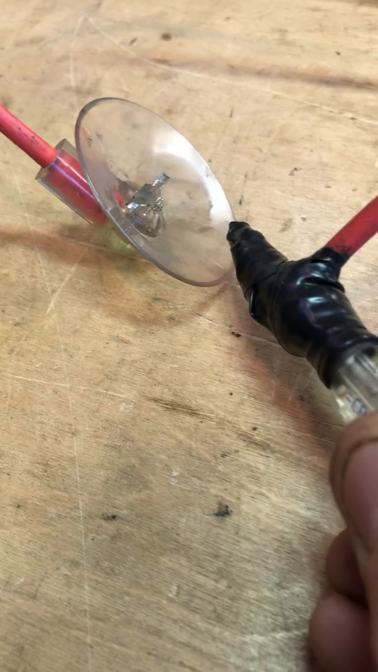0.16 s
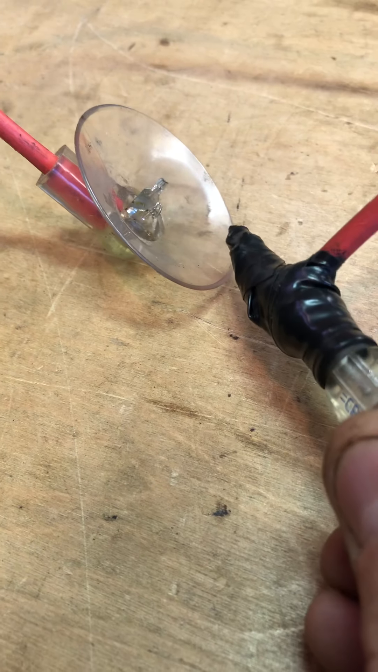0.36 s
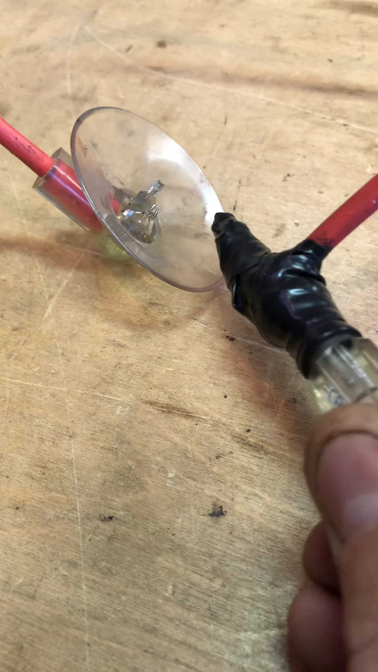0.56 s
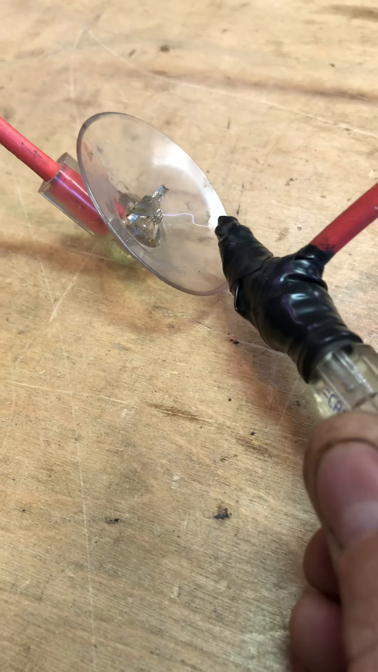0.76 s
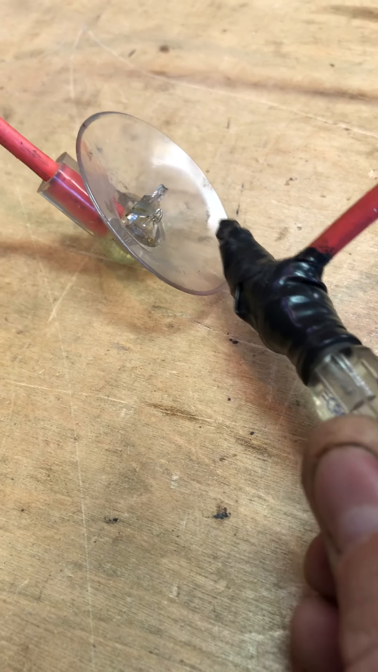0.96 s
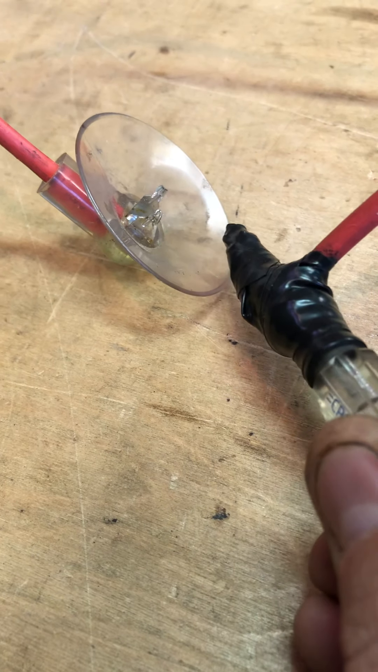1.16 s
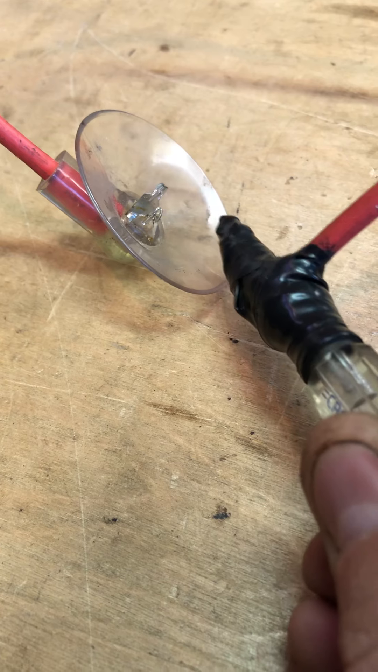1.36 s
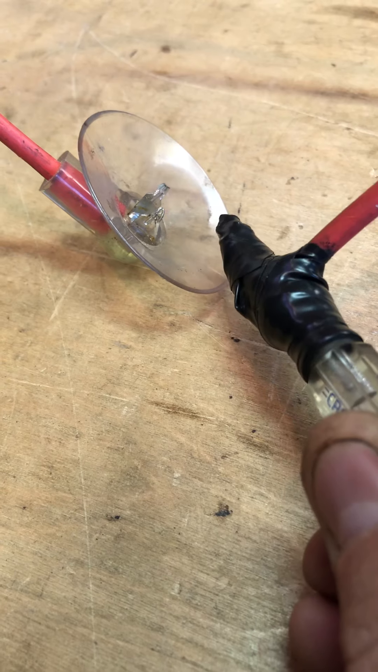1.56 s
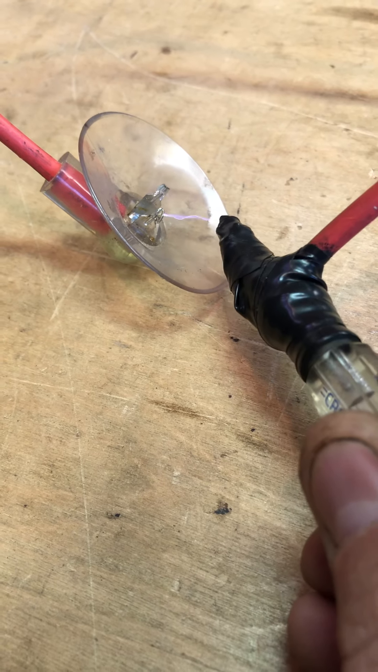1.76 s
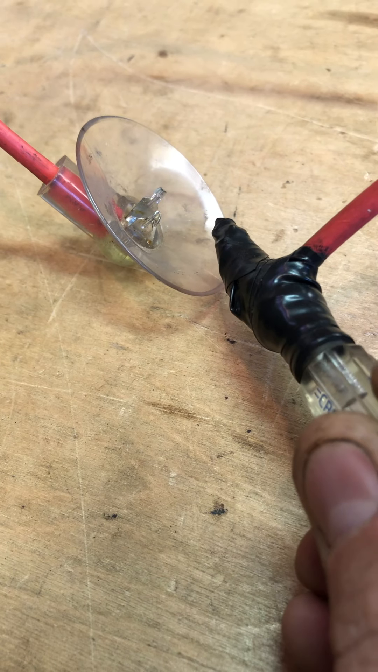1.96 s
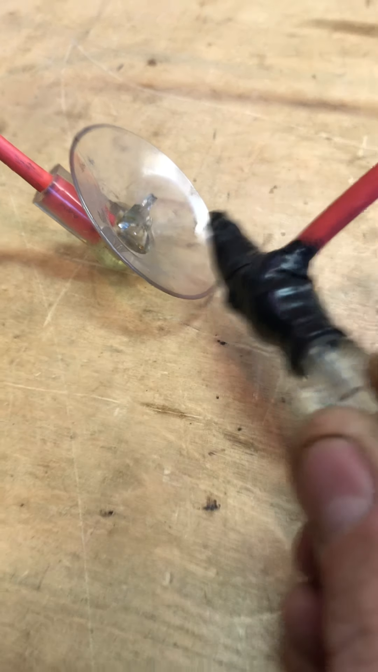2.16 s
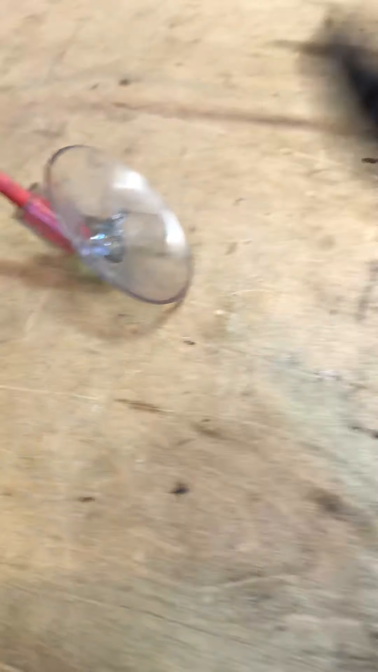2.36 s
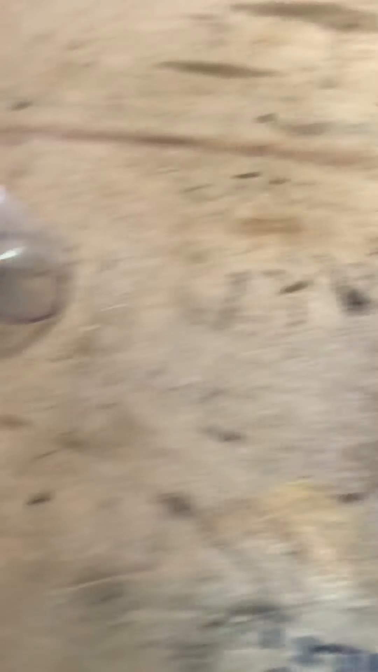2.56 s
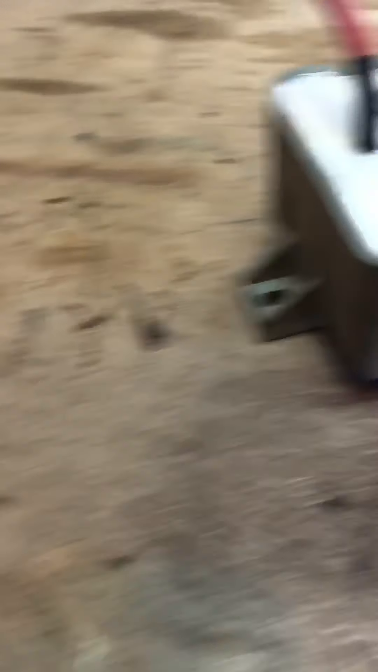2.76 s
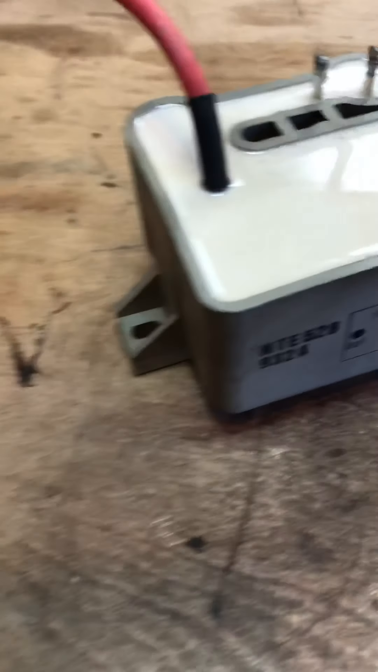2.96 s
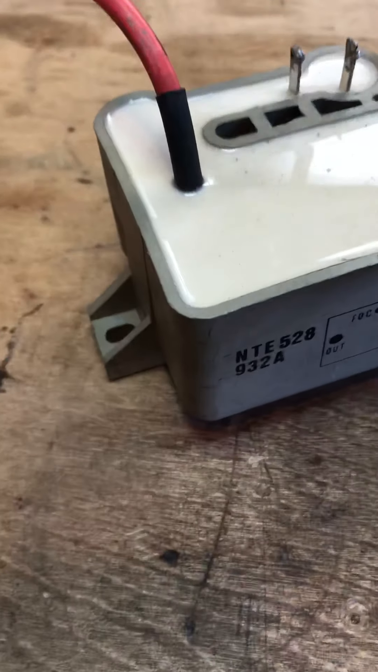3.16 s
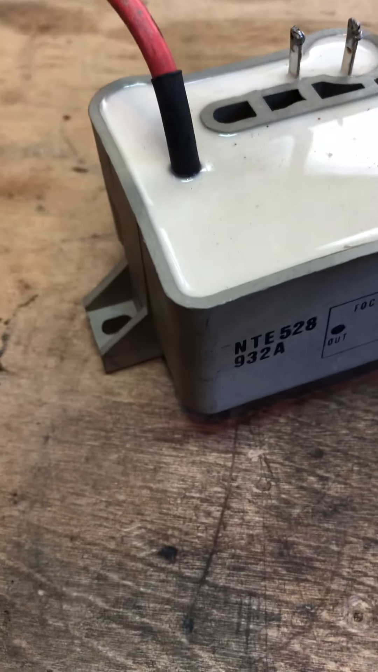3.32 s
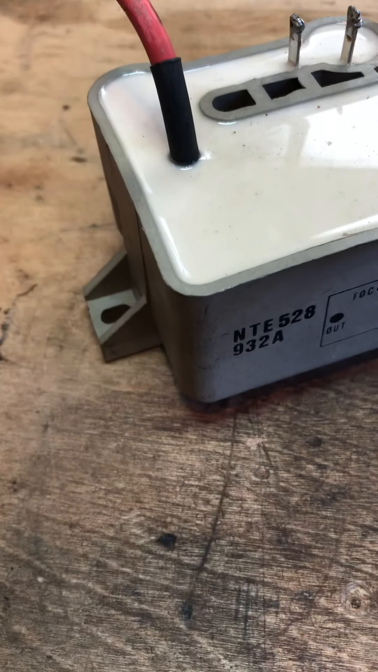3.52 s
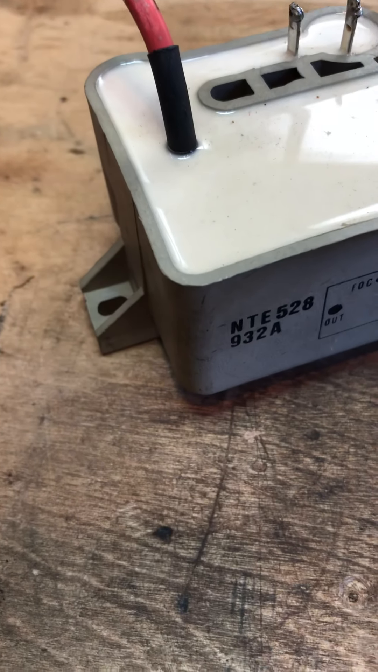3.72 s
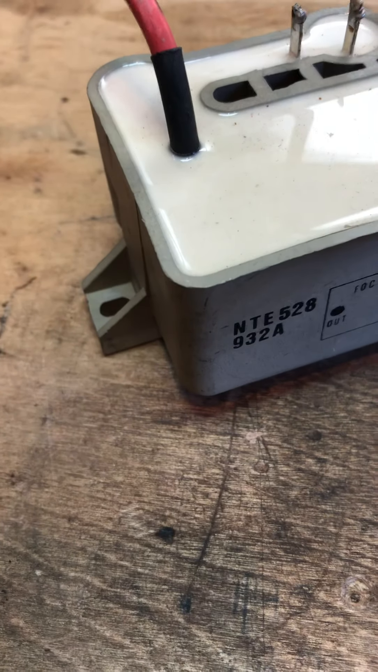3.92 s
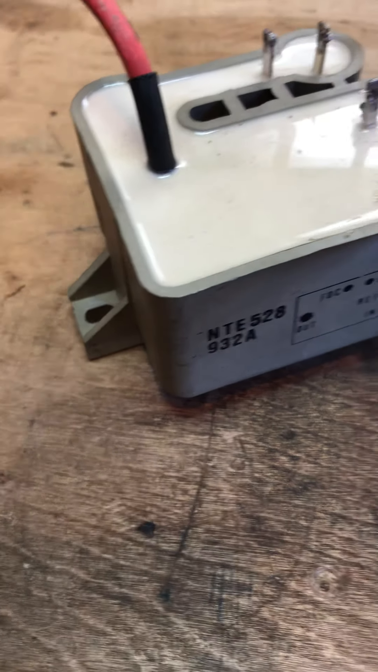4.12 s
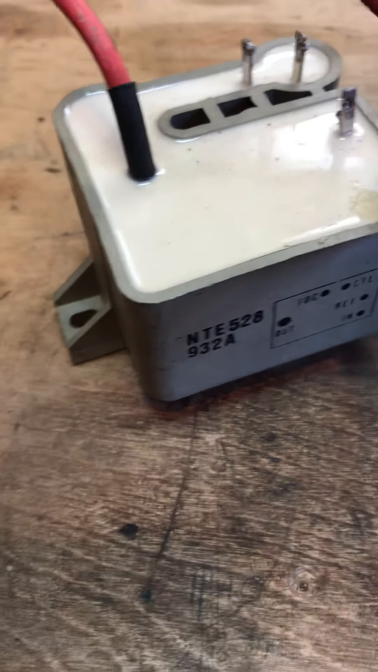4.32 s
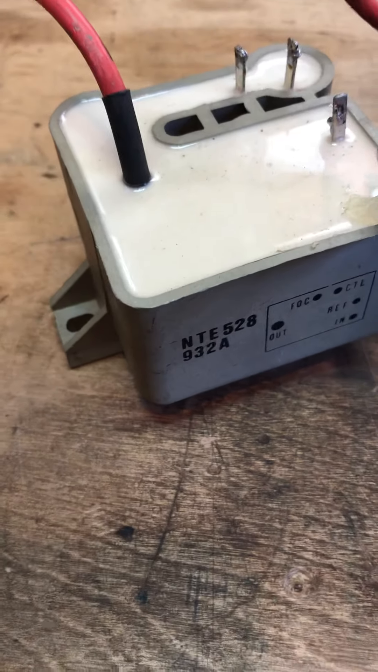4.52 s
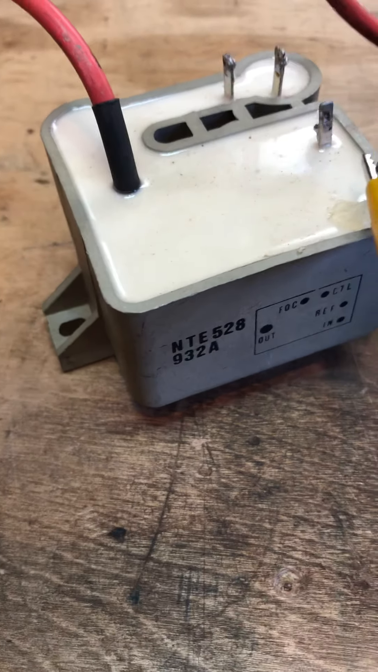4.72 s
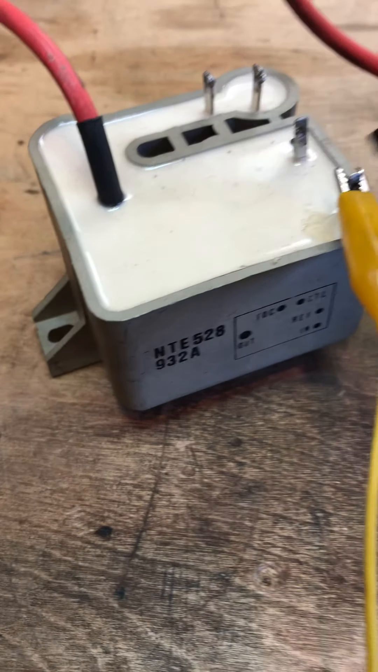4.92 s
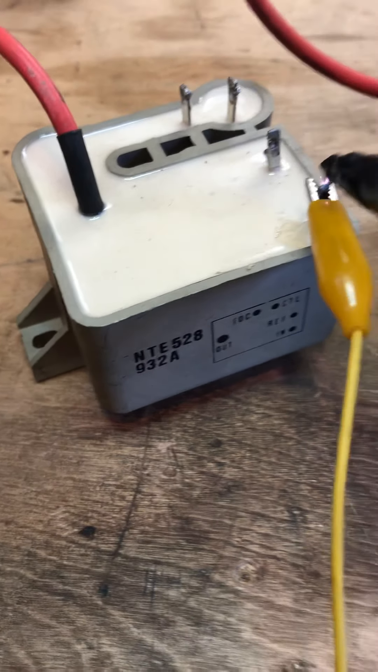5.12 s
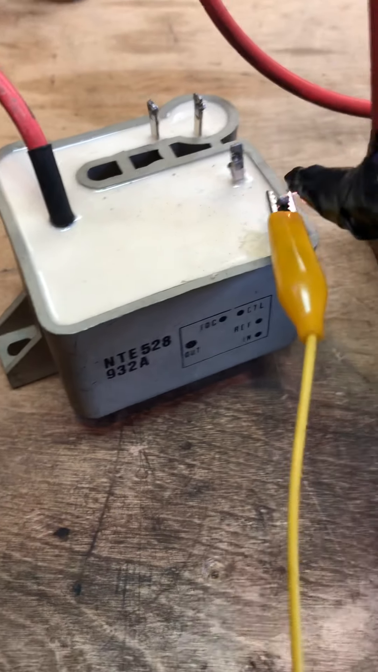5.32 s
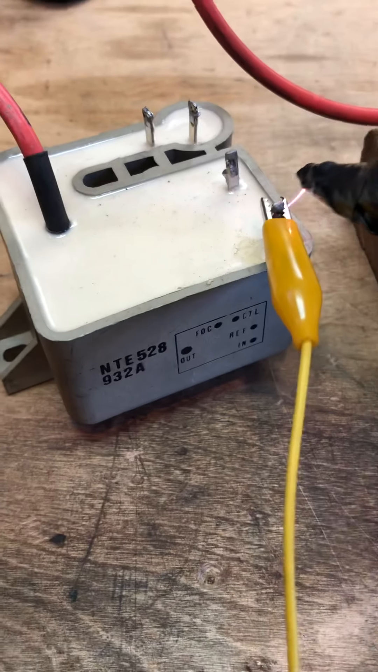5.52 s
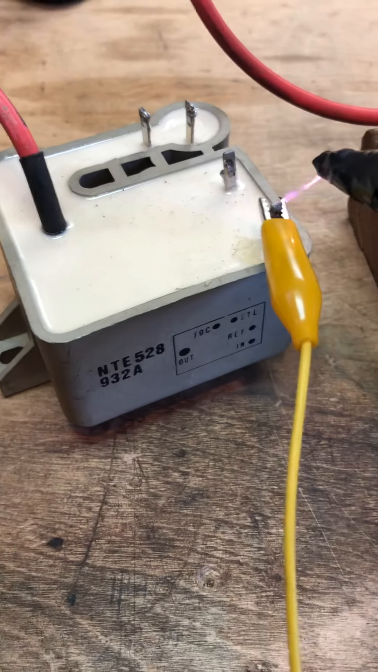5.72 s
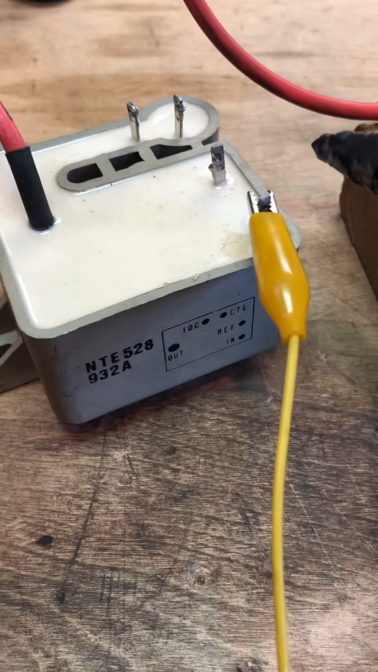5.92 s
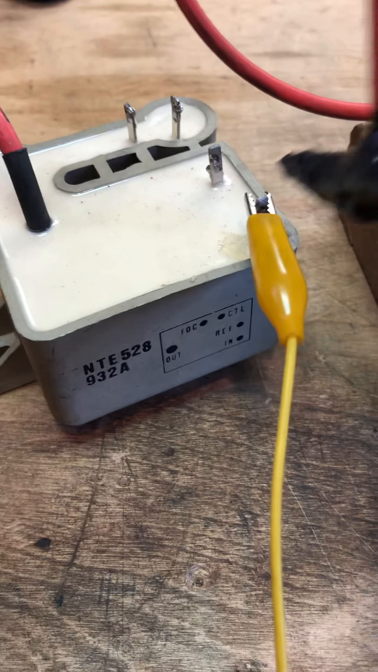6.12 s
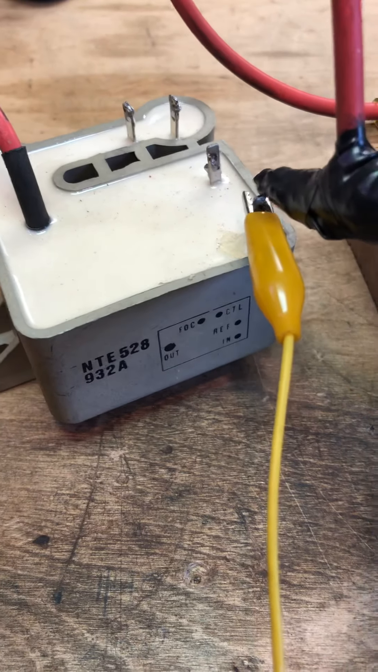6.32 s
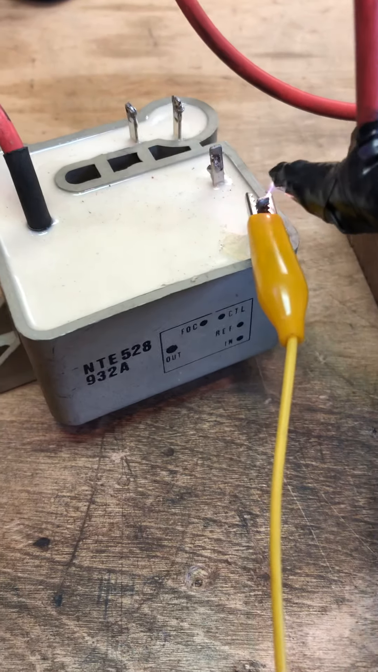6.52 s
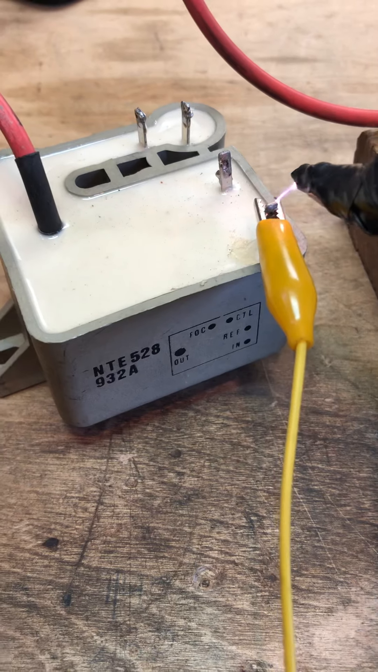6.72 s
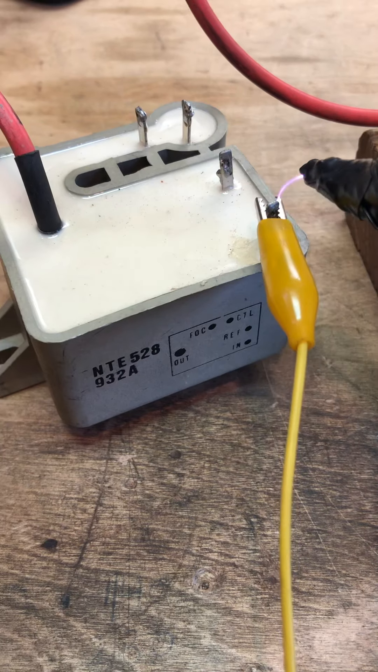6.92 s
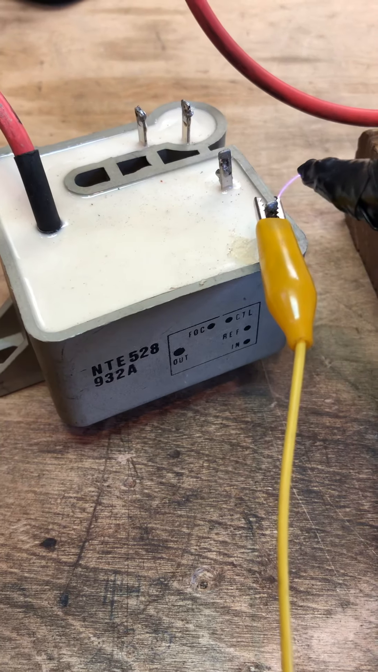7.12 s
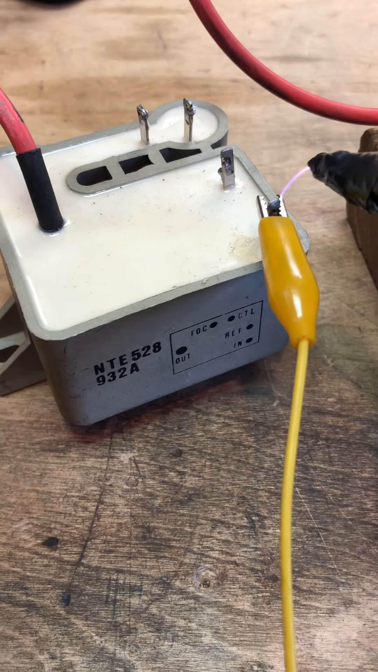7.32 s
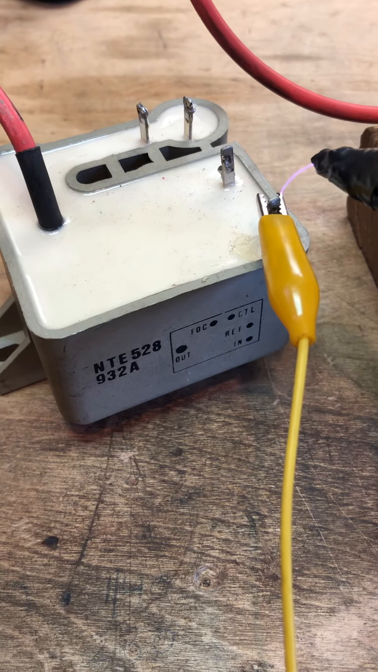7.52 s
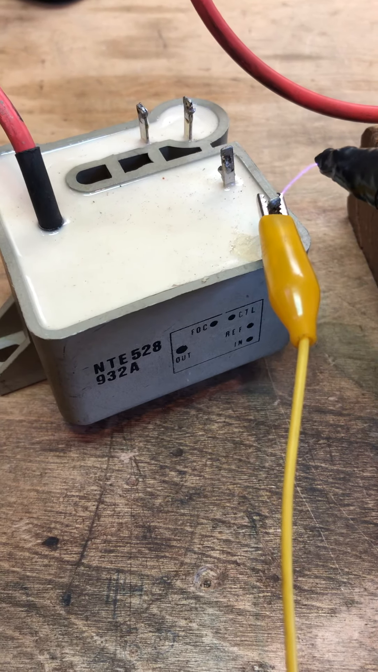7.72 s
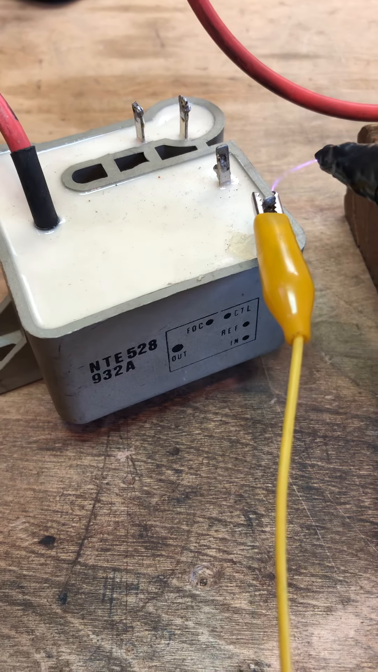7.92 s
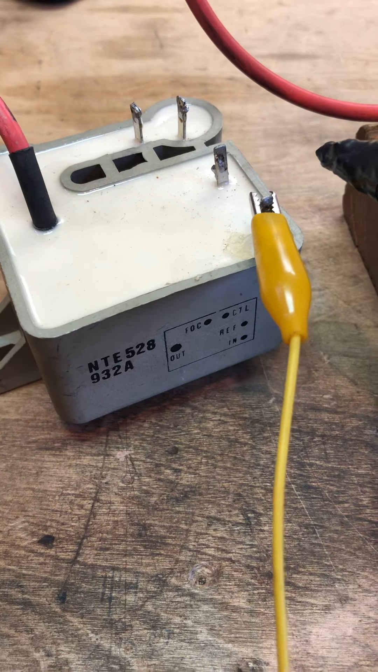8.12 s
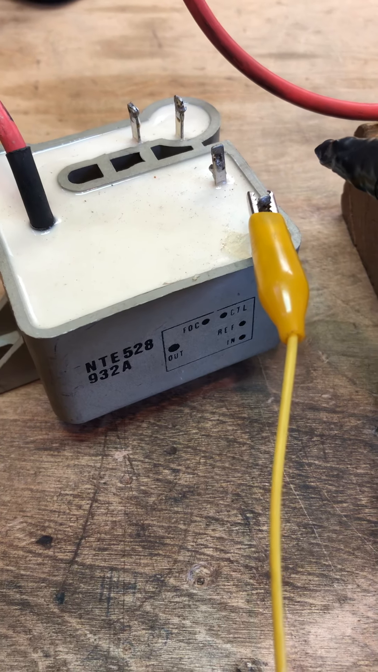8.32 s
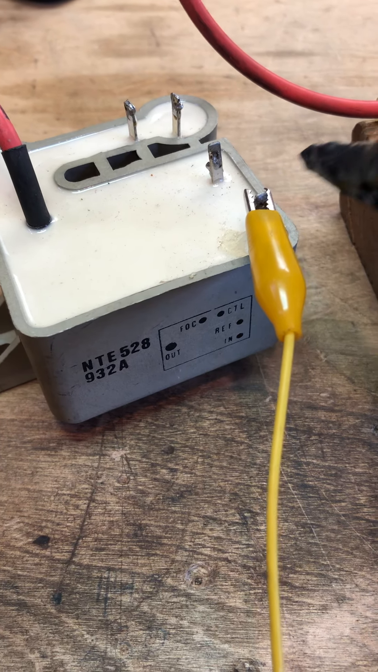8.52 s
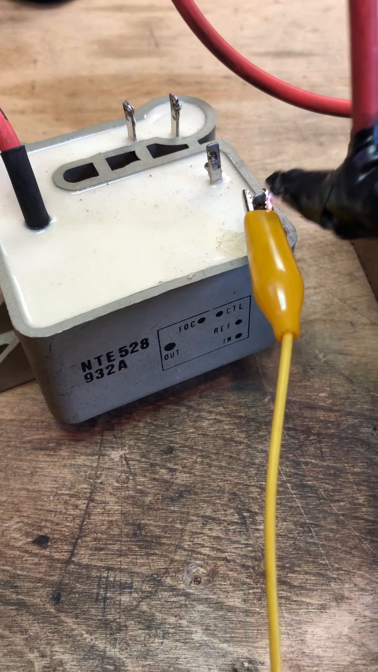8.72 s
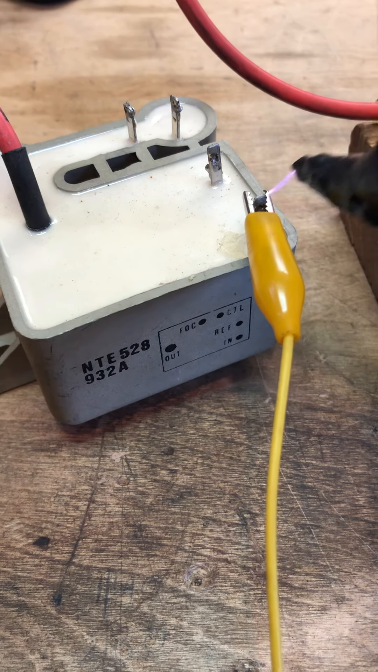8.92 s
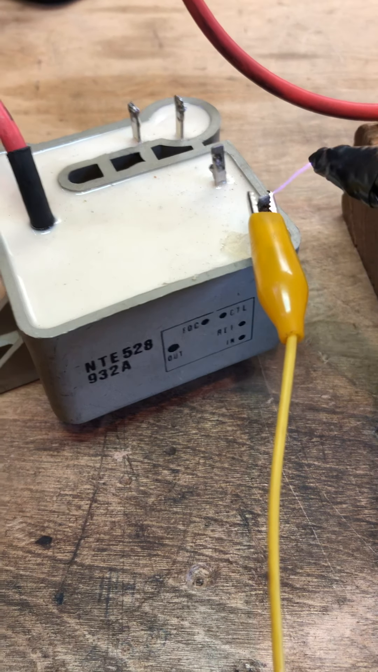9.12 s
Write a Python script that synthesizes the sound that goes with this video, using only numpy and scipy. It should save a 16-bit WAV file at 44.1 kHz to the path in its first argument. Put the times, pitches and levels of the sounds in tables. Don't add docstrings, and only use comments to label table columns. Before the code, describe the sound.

On a wooden workshop bench, a high-voltage supply throws hard, dry spark snaps over a piercing thin whine and low hum. After two seconds the snaps stop, a quick run of fizzing spits grows, then quiet. An arc then sizzles harshly and whistles in gliding, very high notes, stopping and restarting until the end. Very close microphone, ducking after each spark, short bright room tail.

```python
import sys
import numpy as np
from scipy import signal
from scipy.fft import rfft, irfft, next_fast_len
from scipy.io import wavfile
from scipy.ndimage import uniform_filter1d, minimum_filter1d, map_coordinates

SR = 44100
rng = np.random.default_rng(int(sys.argv[2]) if len(sys.argv) > 2 else 0)


def makeup_ratio(level_db):
    decades = np.asarray(level_db, float) / 20
    return 10 ** decades


def put_to_file(sound):
    columns = np.atleast_2d(sound).T
    safe = np.clip(columns, -1, 1)
    whole_steps = np.round(safe * 32767)
    wavfile.write(sys.argv[1], SR, whole_steps.astype(np.int16))


N = 408804
T = np.arange(N) / SR
MOVED_S = 2.45


def unit(x):
    return x / np.sqrt(np.mean(x ** 2) + 1e-20)


def along(points, hz):
    f, v = np.transpose(points)
    return np.interp(np.log(hz + 1), np.log(f + 1), v)


def wobble(rate):
    coarse = T[::8]
    knots = rng.standard_normal(int(N * rate / SR) + 4)
    return np.interp(T, coarse, map_coordinates(knots, [coarse * rate]))


def filtered(x, response):
    m = next_fast_len(N + 8192)
    return irfft(rfft(x, m) * response(np.fft.rfftfreq(m, 1 / SR)), m)[:N]


def spans(tables):
    for rows in tables:
        s, *cols = np.transpose(rows)
        part = slice(round(s[0] * SR), round(s[-1] * SR))
        yield part, [np.interp(T[part], s, c) for c in cols]


def song(tables, jitter_hz, flutter_db):
    out = np.zeros(N)
    tremble = jitter_hz * wobble(700)
    flutter = makeup_ratio(flutter_db * wobble(150))
    for part, (hz, *levels_db) in spans(tables):
        turn = 2 * np.pi * np.cumsum(hz + tremble[part]) / SR
        count = np.arange(len(hz))
        edge = np.minimum(1, np.minimum(count, count[::-1]) / 30)
        multiples = sum(np.sqrt(2) * makeup_ratio(db) * np.sin(k * turn + k * k) for k, db in enumerate(levels_db, start=1))
        out[part] = edge * multiples
    return out * unit(flutter)


def notes(rows, shape):
    shape = np.array(shape)
    return [[(a, f, *(db + shape)), (b, g, *(db + shape))] for a, b, f, g, db in rows]


def patterns(tables):
    return [[(s, hz, *(db + np.array(shape))) for s, hz, db in rows] for shape, rows in tables]


def snap(kicks, body):
    def response(f):
        return sum((-1) ** k * makeup_ratio(db) * 1j * f * w / (c * c - f * f + 1j * f * w)
                   for k, (c, w, db) in enumerate(body))
    return filtered(kicks, response)


# centre in Hz, width in Hz, level in dB.
CUP_BAND = [(6300, 1900, -2)]


def in_cup(x):
    return x - snap(x, CUP_BAND)


# frequency in Hz, level in dB.
HUM_LINES = [(57.8, -56.5), (119.3, -54.5), (240.1, -42.5), (294, -52.5), (479.6, -57), (654.6, -50),
             (1039, -65), (1163, -64)]
# frequency in Hz, density in dB per Hz.
AIR_COLOUR = [(30, -46), (118, -4.5), (185, -12), (243, -6.5), (657, -11.5), (978, -16.5), (11500, -42),
              (16000, -40)]
# time in seconds, level in dB.
SHOP_LEVEL = [(0.0, -43), (3.59, -39.5), (3.92, -45.5), (5.96, -39.5), (7.2, -43.5), (9.27, -39)]


def shop():
    lines = sum(np.sqrt(2) * makeup_ratio(db + 0.9 * wobble(9)) * np.sin(2 * np.pi * hz * T + 0.36 * wobble(6))
                for hz, db in HUM_LINES)
    noise = unit(filtered(rng.standard_normal(N), lambda hz: makeup_ratio(along(AIR_COLOUR, hz))))
    level_db = np.interp(T, *np.transpose(SHOP_LEVEL))
    return makeup_ratio(level_db + 40.5) * (lines + makeup_ratio(-44.5 + 0.51 * wobble(9.4)) * noise)


# time in seconds, frequency in Hz.
CORE_PITCH = [(0, 12365), (2.19, 12320), (2.3, 12430), (2.9, 12410), (3.5, 12345), (9.27, 12355)]
# start and end in seconds, start and end level in dB.
IDLE_WHINE = [(0, 0.294, -45, -40), (0.294, .82, -39, -30), (.85, 1.02, -58, -45), (1.025, 1.07, -23, -27),
              (1.111, 1.304, -23.5, -30.5), (1.298, 1.52, -45, -49), (1.585, 1.78, -55, -45),
              (1.845, 1.92, -48, -38), (1.956, 2.14, -48, -38), (2.143, 2.16, -18, -25),
              (2.18, 2.42, -36.5, -55), (2.428, 2.7, -47, -49), (2.705, 2.767, -53, -48),
              (2.78, 2.897, -47, -43), (2.9, 3.53, -54, -48), (4.603, 5.111, -53, -40.5),
              (5.812, 6.183, -43, -41.5), (8.07, 8.708, -46, -44)]
# start in seconds, length in seconds, level in dB.
CORONA_FITS = [(.0355, .0012, -28), (.0385, .001, -29), (.0432, .002, -22), (.093, .0035, -25),
               (.1452, .0016, -24), (.1942, .0012, -27), (.199, .0015, -24), (.2052, .0014, -25),
               (.2102, .004, -22), (.2262, .0055, -24), (.238, .0028, -24), (.2452, .0016, -23),
               (.2505, .002, -24), (.2575, .0058, -23), (.2772, .0075, -25), (.356, .002, -24)]
LEADER_S, LEADER_DB = .0015, -32


def core_pitch(s):
    return np.interp(s, *np.transpose(CORE_PITCH))


def whine():
    times = np.array([-1] + SPARK_TIMES + [99])
    last = np.searchsorted(times, T, side="right") - 1
    since, until = T - times[last], times[last + 1] - T
    idle_curves = [[(a, core_pitch(a), up), (b, core_pitch(b), to)] for a, b, up, to in IDLE_WHINE]
    fit_curves = [[(s, core_pitch(s), db), (s + length, core_pitch(s), db)] for s, length, db in CORONA_FITS]
    idle = song(idle_curves, jitter_hz=4, flutter_db=1)
    fits = song(fit_curves, jitter_hz=40, flutter_db=1)
    leader = np.sqrt(2) * makeup_ratio(LEADER_DB) * np.sin(2 * np.pi * core_pitch(0) * T) * (until < LEADER_S)
    recharge = 1 - np.exp(-(since / 0.05) ** 2)
    return idle * recharge + fits + leader


# brightness in dB, then rows of time in seconds, strength in dB.
CHAOTIC_ARCS = [
    (5, [(0, -44.5), (.19, -63), (.55, -61), (.56, -49.5), (.765, -50)]),
    (8, [(1.08, -56), (1.226, -51), (1.295, -48)]),
    (6.5, [(3.532, -37.5), (3.8, -38), (3.914, -33.5), (3.922, -38), (3.93, -31.5), (4.018, -27), (4.078, -35), (4.115, -30)]),
    (5, [(5.2, -60), (5.251, -59), (5.447, -30), (5.511, -23.5), (5.523, -30.5), (5.551, -26), (5.591, -32), (5.599, -28.5), (5.645, -25)]),
    (4.5, [(6.255, -65), (6.33, -60), (6.345, -53), (6.47, -54), (6.62, -68), (6.87, -65), (6.88, -52), (6.945, -51), (6.98, -60)]),
    (4.5, [(6.98, -52), (7.007, -30.5), (7.045, -77.5)]),
    (1.5, [(7.075, -50), (7.184, -48), (7.186, -31), (7.279, -31), (7.295, -42), (7.347, -49), (7.41, -54)]),
    (2, [(8.82, -61), (8.845, -41), (8.889, -29.5), (8.915, -29.5)]),
    (7, [(9.075, -35), (9.197, -28.5), (9.213, -42), (9.221, -24), (9.233, -52), (9.257, -25), (9.27, -36)]),
]
# start in seconds, length in seconds, strength in dB, brightness in dB.
FLARE_BURSTS = [(0.839, 0.0072, -39.5, 16), (0.946, 0.007, -34.5, 3), (1.03, 0.035, -54, 10),
                (4.376, 0.05, -47.5, 17), (6.432, .028, -47, 4), (6.728, 0.012, -58, 12),
                (6.79, .008, -60, 10), (7.047, 0.028, -27.5, -1.5), (7.305, 0.017, -37, 7),
                (7.335, 0.018, -38, 8.5), (7.638, 0.018, -35.5, -1), (7.712, 0.01, -37, 8.5),
                (8.924, 0.017, -27, 4), (8.956, 0.094, -45.5, -4), (9.027, 0.013, -27.5, 5)]
# start in seconds, length in seconds, strength in dB, brightness in dB, loss in dB.
FRESH_FLASHES = [
    (5.111, 0.16, -39, 8.5, 17),
    (5.67, 0.16, -49, 13, 18),
    (6.178, 0.052, -40.5, 8, 22),
    (7.78, 0.034, -29.5, -5, 32.5),
    (8.703, 0.067, -33, 3.5, 22),
]
MISSED_STRIKES = [7.086, 7.095, 7.117, 7.121, 7.135, 7.148, 7.157, 7.163, 7.36, 7.752]
SLIP_S, SLIP_DB = .002, -40
# time in seconds, depth in dB.
SPUTTER_DEPTH = [(3.8, .8), (3.87, 4.5), (4.2, 3.5), (5.42, 1), (5.49, 4), (6.2, 1), (6.7, 1.5), (7.17, 4),
                 (7.19, 1), (8.85, 1.5), (9.1, 4)]
# frequency in Hz, level in dB.
LOW_COLOUR = [(1200, -48), (2500, -9), (4500, -2), (5900, -1.5), (7000, 0), (9000, 2.5), (12000, -31)]
HIGH_COLOUR = [(5000, -22), (8500, -17), (11000, 6), (12600, 3), (13500, 9), (15300, 12), (16500, -3.5)]
# frequency in Hz, level in dB.
BENCH_RIPPLES = [(4000, -3), (4700, 5), (5800, -3.5), (6500, 2.5), (8500, -0.5), (9100, -5.5), (9800, 2),
                 (12400, -7.5)]
BRIGHTER, USUAL_DB = 0.073, -31


def sizzle():
    rate, scatter_db, hop_db = 16000, 2, -4
    struck = rng.random(N) < rate / SR
    strikes = unit(struck * makeup_ratio(scatter_db * rng.standard_normal(N)) * rng.choice([-1, 1], N))
    turn = 2 * np.pi * np.cumsum(3450 + 300 * wobble(45) + 300 * wobble(900)) / SR
    locked = unit(sum(makeup_ratio(4 * wobble(300)) * np.sin(k * turn) for k in range(1, 5)))
    chaos = strikes + makeup_ratio(hop_db) * locked

    def coloured(colour):
        return unit(filtered(chaos, lambda hz: makeup_ratio(along(colour, hz) + along(BENCH_RIPPLES, hz)) * (hz > 300)))

    low, high = coloured(LOW_COLOUR), coloured(HIGH_COLOUR)
    throb = np.sin(2 * np.pi * np.cumsum(115 + 35 * wobble(40)) / SR)
    sputter = 1.6 * np.minimum(.3, throb + .4 * wobble(200))
    one_by_one = (T > 3.84) & (T < 5.66)
    sputter = np.where(one_by_one, .2 + .4 * wobble(500), sputter)
    depth_db = np.interp(T, *np.transpose(SPUTTER_DEPTH))
    slips = [(s, SLIP_S, SLIP_DB, 2) for s in MISSED_STRIKES]
    arcs = CHAOTIC_ARCS + [(b, [(s, db), (s + length, db)]) for s, length, db, b in FLARE_BURSTS + slips]
    arcs += [(b, [(s, db), (s + length, db - loss)]) for s, length, db, b, loss in FRESH_FLASHES]
    out = np.zeros(N)
    for (bright_db, _), (part, (low_db,)) in zip(arcs, spans([rows for _, rows in arcs])):
        high_db = low_db + bright_db + BRIGHTER * (USUAL_DB - low_db)
        both = makeup_ratio(low_db + 8.0) * low[part] + makeup_ratio(high_db + 9.0) * high[part]
        out[part] += makeup_ratio(depth_db[part] * (sputter[part] - 2.12)) * both
    return out


SPARK_TIMES = [0.0458, 0.0973, 0.1471, 0.7706, 0.8129, 0.8804, 0.9217, 0.9862, 1.0679, 1.3006, 1.3421,
               1.3832, 1.4422, 1.48, 1.517, 1.6145, 1.6511, 1.6889, 1.728, 1.7654, 1.8731, 1.9114, 1.9913,
               2.0281, 2.0676, 2.1085, 2.164]
# time in seconds, peak in dB.
ARC_BREAKS = [(3.5328, -22), (4.108, -43), (4.9227, -36), (5.1088, -28), (5.686, -29), (5.6942, -19.5),
              (5.8095, -29), (6.179, -23), (6.731, -44), (6.936, -34), (7.0086, -27), (8.0645, -38),
              (8.703, -35)]
# delay in seconds, level in dB.
BENCH_ECHOES = [(0, -25.5), (.001, -38), (.0034, -33), (.006, -43.5), (.009, -84)]
# centre in Hz, width in Hz, level in dB.
SPARK_BODY = [(1250, 1470, 0.5), (4000, 3400, 3.5), (10100, 5700, 3), (13700, 8600, -12)]
SPARK_DB, SPARK_SPREAD_DB = -7, 1.5


def sparks():
    kicks, t = np.zeros(N), np.arange(400) / SR
    fade = makeup_ratio(np.interp(t, *np.transpose(BENCH_ECHOES)))
    usual = rng.standard_normal(len(t))
    for s, db in zip(SPARK_TIMES, SPARK_DB + SPARK_SPREAD_DB * rng.standard_normal(len(SPARK_TIMES))):
        at = round(s * SR) + 24
        kicks[at - 24:at] += makeup_ratio(db - 10) * rng.standard_normal(24)
        kicks[at:at + 2] += makeup_ratio(db + 25.5) * np.array([1, -.7])
        echoes = np.gradient(uniform_filter1d(usual + 0.7 * rng.standard_normal(len(t)), size=3))
        kicks[at + 4:][:len(t)] += makeup_ratio(db + 33.0) * fade * echoes
    for s, db in ARC_BREAKS:
        kicks[round(s * SR):][:2] += makeup_ratio(db + 19) * np.array([-1, 1])
    return snap(kicks, SPARK_BODY)


# time in seconds, depth in dB.
DROP_OUTS = [(.267, 14), (.329, 11), (.352, 12), (.648, 16), (3.637, 4), (3.685, 4), (3.793, 6), (3.849, 6),
             (3.8587, 9), (3.8687, 8), (3.8777, 9), (3.887, 8), (3.8979, 11), (3.907, 8), (3.9173, 9),
             (3.928, 8), (3.9372, 10), (3.9465, 9), (3.9571, 8), (3.966, 8), (3.976, 7), (3.985, 6),
             (3.9933, 9), (4.0341, 8), (4.0427, 12), (4.051, 9), (4.058, 8), (4.0658, 9), (4.071, 8),
             (4.0806, 8), (4.0898, 10), (4.1053, 10), (5.479, 6), (5.4893, 9), (5.4973, 10), (5.5067, 11),
             (5.515, 9), (5.5244, 14), (5.5462, 6), (5.5657, 9), (5.575, 8), (5.5829, 7), (5.5898, 13),
             (5.6098, 9), (5.6284, 13)]
LULL_S_PER_DB = .00022


def lulls():
    dip_db = np.zeros(N)
    for s, db in DROP_OUTS:
        part = slice(round((s - .012) * SR), round((s + .012) * SR))
        dip_db[part] -= 1.1 * db * np.exp(-((T[part] - s) / (LULL_S_PER_DB * db)) ** 4)
    return makeup_ratio(dip_db)


# start in seconds, end in seconds, ticks per second, level in dB.
CORONA_TICKS = [
    (.19, 0.366, 230, -43),
    (0.372, 0.569, 420, -44),
    (2.296, 2.51, 70, -50),
]
# centre in Hz, width in Hz, level in dB.
TICK_BODY = [(3600, 3500, 1), (12000, 8000, 8)]


def corona():
    rate, size_db = (sum(row[k] * ((T >= row[0]) & (T < row[1])) for row in CORONA_TICKS) for k in (2, 3))
    count = np.cumsum(rate * makeup_ratio(2 * wobble(40) + 1.5 * wobble(500))) / SR
    ticks = np.diff(np.floor(count), prepend=0) * makeup_ratio(size_db + 21.0 + 1.8 * rng.standard_normal(N))
    return snap(lulls() * ticks, TICK_BODY)


# start and end in seconds, start and end rate in Hz, level in dB.
LEANING_RATES = [(3.535, 3.72, 13800, 13950, -27), (3.535, 3.7, 11100, 11000, -33),
                 (3.56, 3.72, 8300, 8300, -36), (3.93, 4.04, 11200, 11300, -28),
                 (3.738, 3.8, 4300, 4900, -28), (3.738, 3.79, 8000, 8200, -32),
                 (3.8, 3.85, 6100, 6300, -29), (5.11, 5.24, 7000, 7000, -40), (5.4, 5.5, 4700, 4700, -34),
                 (.56, .765, 14000, 14000, -42), (7.19, 7.24, 3000, 3300, -36),
                 (9.145, 9.2, 4300, 3500, -33), (4.01, 4.03, 4700, 4700, -28),
                 (5.2, 5.44, 15500, 15600, -31), (5.435, 5.565, 7000, 6700, -24.5),
                 (5.49, 5.645, 13600, 13800, -28), (7.19, 7.29, 6800, 7000, -35),
                 (8.865, 8.91, 7000, 7000, -29), (8.924, 8.94, 7200, 7000, -25),
                 (9.145, 9.2, 14700, 15600, -22), (9.225, 9.255, 15500, 15500, -22)]


def leaning():
    return song(notes(LEANING_RATES, [0]), jitter_hz=300, flutter_db=3)


# start and end in seconds, start and end rate in Hz, level in dB.
BRIEF_NOTES = [(.82, .848, 12100, 12400, -24), (.93, .952, 13200, 12450, -26),
               (1.525, 1.575, 12700, 12800, -20), (1.782, 1.842, 12950, 12950, -25),
               (1.92, 1.955, 13200, 12200, -22), (5.645, 5.668, 10350, 9800, -26.5),
               (5.668, 5.687, 10000, 13300, -21), (6.985, 7.009, 11100, 11300, -29),
               (7.009, 7.047, 10700, 10100, -30.5), (7.19, 7.29, 9300, 9300, -26.5),
               (7.29, 7.397, 9300, 9240, -15.5), (7.4, 7.415, 9250, 9200, -23),
               (7.416, 7.425, 10050, 10280, -21), (7.055, 7.07, 9500, 9450, -30),
               (5.687, 5.696, 9800, 9750, -17), (4.55, 4.561, 11000, 12800, -19),
               (4.567, 4.586, 13400, 11800, -21), (4.588, 4.602, 12150, 13900, -18),
               (8.91, 8.925, 9300, 9290, -21), (8.94, 8.955, 9140, 9150, -19),
               (8.955, 9.075, 10630, 10700, -16), (9.088, 9.104, 11300, 12700, -23),
               (9.115, 9.13, 10900, 10600, -19), (9.152, 9.164, 11700, 12400, -23),
               (9.168, 9.18, 11900, 10800, -25), (9.2, 9.22, 10650, 10700, -14.5),
               (9.258, 9.27, 10640, 10550, -17)]
STRONG_DB = -40


def chirps():
    broken = sum((T > s) & (T < s + length) for s, length, db, _ in FLARE_BURSTS if db > STRONG_DB)
    return makeup_ratio(-14 * broken) * song(notes(BRIEF_NOTES, [0]), jitter_hz=70, flutter_db=1.8)


# time in seconds, peak in dB.
HIDDEN_SPITS = [
    (.84, -15),
    (1.3976, -16),
    (1.574, -13.5),
    (1.778, -13),
    (1.952, -16.5),
    (2.7677, -14.5),
    (2.831, -23),
    (2.898, -11.5),
    (3.0782, -26.5),
]
OPENING_RUN = [2.5132, 2.5305, 2.5514, 2.57, 2.5895, 2.61, 2.6302, 2.6537, 2.678, 2.7008, 2.7265]
RUN_DB, RUN_DB_PER_S = -23, 45
# centre in Hz, width in Hz, level in dB.
FAR_BODY = [(3010, 1600, 0.5), (7450, 1800, -4.5), (12000, 1800, -3)]
BOX_HZ, BOX_SPREAD_HZ, BOX_T60_S, BOX_DB = 2900, 300, .014, -15


def spits():
    kicks, rings, t = np.zeros(N), np.zeros(N), np.arange(900) / SR
    run = [(s, RUN_DB + RUN_DB_PER_S * (s - OPENING_RUN[0])) for s in OPENING_RUN]
    for s, db in HIDDEN_SPITS + ARC_BREAKS + run:
        at = round(s * SR)
        kicks[at:][:len(t)] += makeup_ratio(db - 5.5 - 20 * t / 0.013) * rng.standard_normal(len(t))
        hz = rng.normal(BOX_HZ, BOX_SPREAD_HZ) + 500 * uniform_filter1d(rng.standard_normal(len(t)), size=12)
        ring = makeup_ratio(db + BOX_DB - 60 * t / BOX_T60_S) * np.sin(2 * np.pi * np.cumsum(hz) / SR)
        rings[at:][:len(t)] += (MOVED_S < s < 3.2) * ring
    return snap(kicks, FAR_BODY) + rings


# time in seconds, level in dB.
HAND_SHIFTS = [
    (1.09, -41),
    (1.365, -41),
]


def thumps():
    return sum(makeup_ratio(db) * np.exp(-((T - s) / 0.014) ** 2) * np.sin(2 * np.pi * 65 * (T - s))
               for s, db in HAND_SHIFTS)


# level of each multiple in dB, then rows of time in seconds, pattern rate in Hz, level in dB.
PAIRED_STRIKES = [
    ([0, 0], [(3.721, 6820, -25), (3.737, 7000, -21)]),
    ([-14, 0], [(6.39, 6550, -30), (6.43, 6800, -26), (6.445, 7350, -24), (6.495, 7520, -24), (6.525, 7780, -15.5), (6.56, 8150, -22)]),
]


def paired_arc():
    return song(patterns(PAIRED_STRIKES), jitter_hz=90, flutter_db=2.0)


# level of each multiple in dB, then rows of time in seconds, pattern rate in Hz, level in dB.
FRAYED_STRIKES = [
    ([-11, 0], [(3.745, 4950, -24), (3.775, 5550, -17.5), (3.79, 5750, -19), (3.805, 6000, -24), (3.845, 6100, -22.5)]),
    ([0, -2], [(3.845, 6200, -28), (3.93, 6040, -36)]),
    ([0, -17, -9], [(9.083, 5370, -35), (9.093, 5100, -28), (9.104, 4840, -30)]),
    ([-16, -22, 0], [(9.144, 5100, -40), (9.182, 5000, -18), (9.2, 5100, -21)]),
]


def frayed_arc():
    return song(patterns(FRAYED_STRIKES), jitter_hz=250, flutter_db=4)


# time in seconds, strike rate in Hz, level in dB.
STEADY_STRIKES = [
    [(4.06, 9700, -30), (4.075, 10000, -20), (4.098, 9800, -24), (4.108, 10550, -21), (4.148, 10700, -18.5),
     (4.176, 11860, -21), (4.214, 11900, -33.5), (4.308, 11280, -17.5), (4.38, 10070, -23.5)],
    [(4.43, 9600, -24.5), (4.458, 9430, -37), (4.478, 9960, -25.5), (4.55, 10770, -18)],
    [(5.698, 10970, -22), (5.706, 11300, -21), (5.722, 10840, -19), (5.772, 11270, -20), (5.78, 11710, -21),
     (5.792, 13190, -17), (5.802, 13390, -14), (5.812, 12500, -15)],
    [(6.56, 8270, -36), (6.662, 8460, -38), (6.718, 8600, -61), (6.772, 9230, -23), (6.828, 9400, -48),
     (6.87, 9600, -34), (6.908, 9100, -30.5), (6.98, 9800, -37.5)],
    [(7.797, 12480, -19), (7.831, 13040, -21), (7.841, 12870, -24), (7.849, 13750, -18),
     (7.861, 13320, -24), (7.913, 13510, -22), (8.05, 13600, -26), (8.065, 13700, -30)],
]


def steady_arc():
    return song(STEADY_STRIKES, jitter_hz=50, flutter_db=1.2)


# level of each multiple in dB, then rows of time in seconds, pattern rate in Hz, level in dB.
HALVED_STRIKES = [
    ([-3.5, -2, 1], [(7.075, 4660, -24), (7.093, 4690, -21.5), (7.185, 4586, -20.5)]),
    ([-12.5, -5.5, 0], [(7.425, 5210, -22), (7.459, 5034, -19.5), (7.563, 5204, -21.5), (7.601, 5100, -20), (7.655, 4960, -23), (7.71, 5180, -20), (7.725, 4990, -22), (7.775, 5110, -19.5)]),
]


def halved_arc():
    return song(patterns(HALVED_STRIKES), jitter_hz=20, flutter_db=0.5)


# start and end in seconds, start and end rate in Hz, level in dB.
TRIPLE_STRIKES = [
    (7.775, 7.797, 3600, 3700, -35.5),
    (9.026, 9.041, 3770, 3760, -29.5),
    (9.075, 9.083, 3700, 3720, -28),
    (9.104, 9.115, 3700, 3520, -28),
    (9.13, 9.144, 3660, 3790, -28),
    (9.17, 9.18, 3900, 3700, -34.5),
    (9.227, 9.238, 4080, 4080, -36),
    (9.239, 9.248, 3950, 3950, -33),
    (9.254, 9.259, 3720, 3600, -26),
]
TRIPLE_SHAPE = [-2.5, 2.5, 10, 1]


def thirds_arc():
    return song(notes(TRIPLE_STRIKES, TRIPLE_SHAPE), jitter_hz=60, flutter_db=2.5)


# frequency in Hz, level in dB.
TAIL_COLOUR = [(600, 6), (1500, -1), (2500, -4), (3300, 2.5), (4300, -1.5), (5500, -2), (8000, -6),
               (15000, -2.5)]


def spark_tail(bang):
    return filtered(bang, lambda hz: makeup_ratio(along(TAIL_COLOUR, hz)))


# frequency in Hz, decay time (60 dB) in seconds.
ROOM_DECAY = [(500, 0.086), (4000, 0.3), (8000, 0.26), (15000, 0.17)]


def room(x):
    hz, t, z = signal.stft(rng.standard_normal(SR // 2), SR, nperseg=256)
    tail = signal.istft(z * makeup_ratio(-60 * t / along(ROOM_DECAY, hz)[:, None]), SR, nperseg=256)[1]
    delayed = np.pad(x, (180, 0))
    return signal.fftconvolve(delayed, tail / np.linalg.norm(tail))[:N]


def scene():
    hiss = sizzle()
    arc = hiss - snap(hiss * (T < MOVED_S), CUP_BAND)
    arc += paired_arc() + frayed_arc() + steady_arc() + halved_arc() + thirds_arc() + chirps()
    arc = lulls() * (arc + leaning())
    arc += in_cup(corona())
    bang, spit = in_cup(sparks()), spits()
    wet = makeup_ratio(-16.5) * arc + makeup_ratio(-14.5) * spit + makeup_ratio(-13.5) * spark_tail(bang)
    return (arc + bang + spit + whine() + room(wet) + shop() + thumps())[None]


def top_cut(x):
    return signal.sosfilt(signal.butter(12, 16830, fs=SR, output="sos"), x)


TOP_HZ = 15780


def record(dry):
    x = filtered(dry[0], lambda hz: makeup_ratio(np.interp(hz, [TOP_HZ - 150, TOP_HZ + 150], [0, -55])))
    need = np.minimum(1, .7 / (np.abs(x) + 1e-9))
    held = minimum_filter1d(need, size=500, origin=215)
    gain = uniform_filter1d(held, size=40)
    return top_cut((x * gain)[None])


dry = scene()
out = record(dry)
put_to_file(out)
```